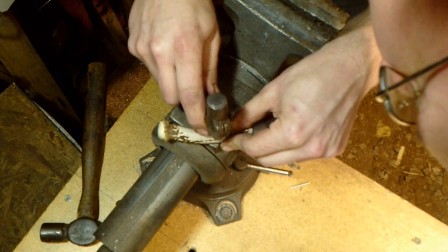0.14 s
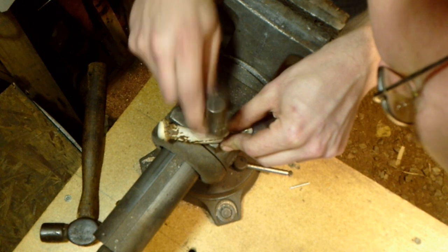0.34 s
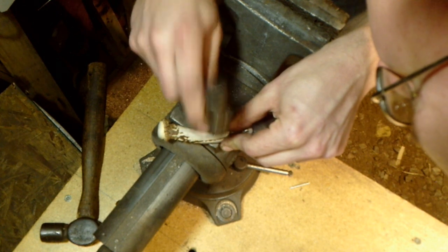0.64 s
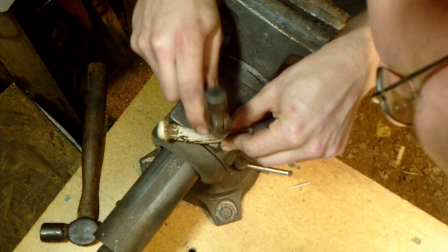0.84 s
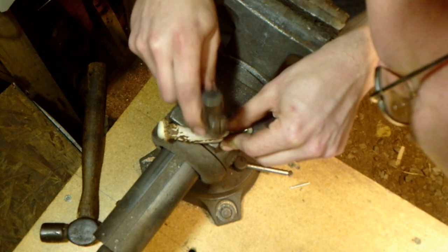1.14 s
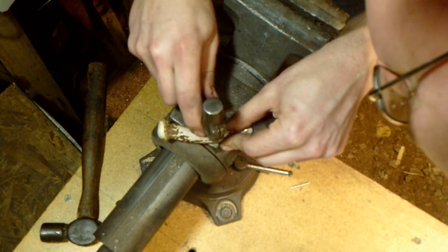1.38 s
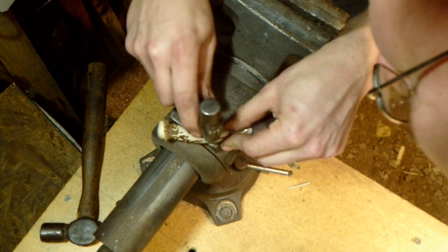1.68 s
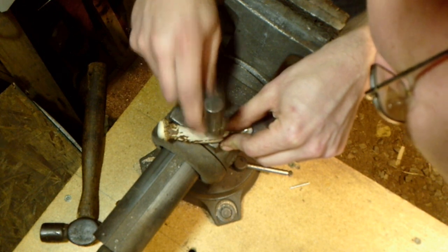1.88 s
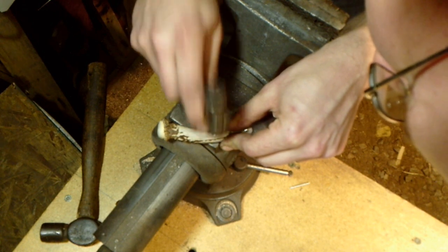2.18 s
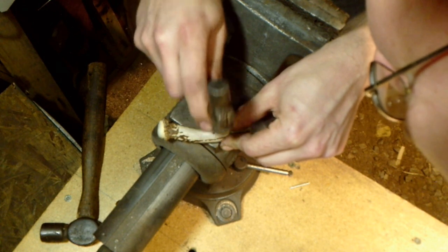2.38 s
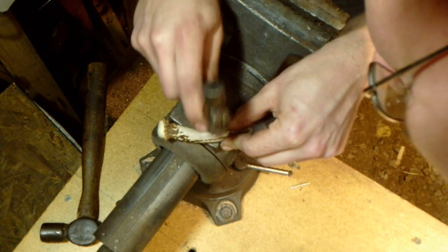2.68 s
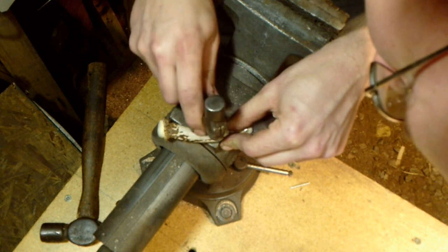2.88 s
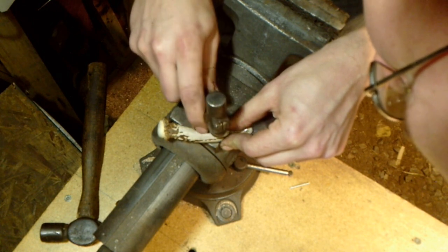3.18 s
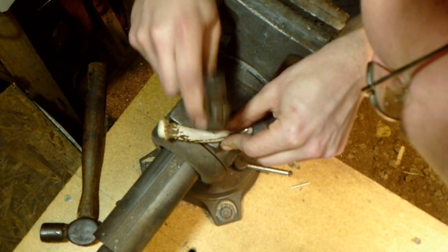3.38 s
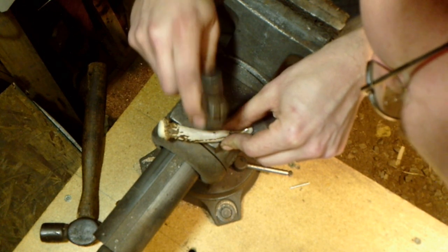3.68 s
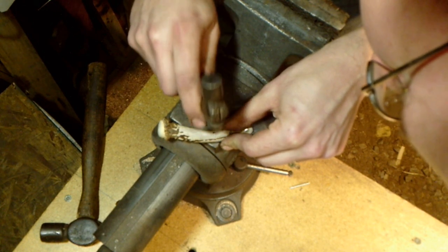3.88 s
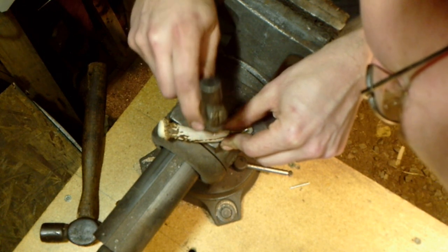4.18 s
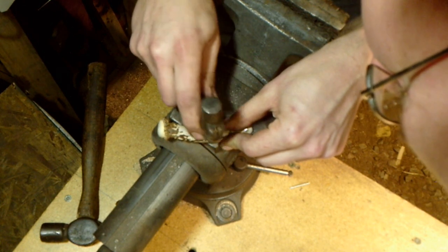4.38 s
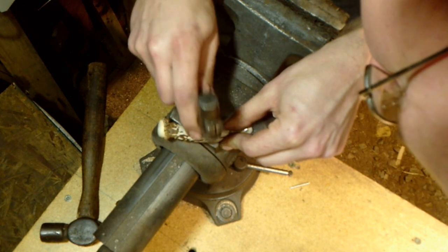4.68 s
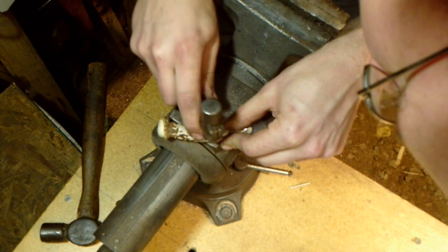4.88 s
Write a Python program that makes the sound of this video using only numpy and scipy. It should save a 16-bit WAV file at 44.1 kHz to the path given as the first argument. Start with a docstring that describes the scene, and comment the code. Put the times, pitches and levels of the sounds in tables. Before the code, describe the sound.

From the first instant a small hammer strikes a steel rivet held on a bench vise, and it continues evenly to the end at 5 seconds: seventeen blows, about 0.3 seconds apart, the pace quickening very slightly. Each is an abrupt, bright metal crack, then a short clanking ring strongest around 2 to 2.5 kHz, with a hollow wooden knock from the bench at about 600 to 900 Hz. Everything dies within about 0.15 seconds, apart from a weak low tail, in a small, dry workshop. Force and hardness vary a little; blows around 1.3 to 2 seconds are among the strongest and brightest, while several after 3.1 seconds are duller. At about 4.5 seconds a tiny rising scrape falls between blows, barely audible. Behind lie soft steady rumble, hiss and a low hum near 100 Hz, slowly sagging and fading. The close mono pickup has little treble and crunches on peaks.

```python
"""A small hammer peens a steel rivet on a bench vise, about three even blows a second, heard close up.
Each blow is a bright noise crack over dying sines for the steel and the wooden bench that it knocks.
Bands of fast-dying noise answer as the small, dry workshop; a faint scrape falls between two blows.
Further back lie steady rumble and hiss, and a low hum that sags and fades.
The close recorder keeps little above 5 kHz and clips the loudest peaks."""
import sys
import numpy as np
from scipy import signal
from scipy.io import wavfile

SR = 44100
rng = np.random.default_rng(int(sys.argv[2]) if len(sys.argv) > 2 else 0)


def transcribe(signal):
    """Save signal, clipped to [-1, 1], as a 16-bit WAV file at the path in sys.argv[1]."""
    frames = np.atleast_2d(signal).T
    limited = np.clip(frames, -1, 1)
    pcm = np.round(limited * 32767).astype(np.int16)
    wavfile.write(sys.argv[1], SR, pcm)


N = 222161

# Steady air of the workshop. Each row: frequency in Hz, relative density in dB per Hz.
AIR_SPECTRUM = [(20, 0), (60, -1.5), (100, -7), (150, -15), (400, -18), (950, -21.5), (1400, -28.5),
                (2800, -31), (4500, -35.5), (6000, -37.5)]
# Dense response of the workshop to a blow. Each row: frequency in Hz, relative density in dB per Hz.
ROOM_SPECTRUM = [(30, -18.5), (150, -9.5), (400, 0.5), (850, 1), (1250, -5.5), (1800, -3), (2300, -2.5),
                 (3000, 0.5), (4000, -3), (5000, -5.5), (6000, -5)]
# Decay of the workshop. Each row: frequency in Hz, time to fall by 60 dB in s.
ROOM_DECAY = [(60, 0.53), (200, 0.27), (700, 0.14), (1500, 0.15), (3000, 0.12), (5500, 0.1)]
# Bench with the vise bolted on, plus a few long-ringing low resonances of the workshop. Each row: frequency in
# Hz, relative level in dB, time to fall by 60 dB in s.
BENCH_MODES = [(52.7, -27, 0.55), (74.5, -25.5, 0.46), (92.6, -21.5, 0.32), (151.3, -21.5, 0.14),
               (180.5, -17.5, 0.16), (227.5, -13.5, 0.15), (262.4, -21.5, 0.12), (303.7, -15.5, 0.16),
               (319.3, -17, 0.173), (365.2, -19.5, 0.24), (422, -11.5, 0.13), (465.8, -15.5, 0.153),
               (479.6, -24, 0.28), (523.3, -13.5, 0.114), (542.4, -16.5, 0.141), (606.7, -9.5, 0.124),
               (622.2, -13, 0.18), (641, -6.5, 0.11), (677.4, -15, 0.15), (705, -24, 0.186),
               (750, -22, 0.26), (796.6, -11.5, 0.15), (855.3, -15, 0.16), (890.9, -9.5, 0.14),
               (912.4, -9.5, 0.14), (936, -22.5, 0.24), (1009, -16.5, 0.164), (1032, -15, 0.1)]
# Vise jaws and hammer head. Each row: frequency in Hz, relative level in dB, time to fall by 60 dB in s.
STEEL_MODES = [(1267.3, -18.5, 0.129), (1495, -23.5, 0.167), (1621, -18.5, 0.17), (1782, -14, 0.105),
               (1836, -16, 0.097), (2022, -19, 0.12), (2128, -13.5, 0.112), (2178.5, -6, 0.125),
               (2200.5, -10, 0.15), (2254, -10.5, 0.14), (2316, -7.5, 0.11), (2366.2, -1.1, 0.1),
               (2390.7, -5, 0.13), (2462, -18.5, 0.047), (2762, -13.5, 0.087), (2784, -10, 0.11),
               (2868, -14, 0.11), (2946, -12.5, 0.11), (3320, -18.5, 0.088), (3336, -15.5, 0.077),
               (3400, -11.5, 0.13), (3574, -16.5, 0.11), (3610, -16, 0.13), (3790, -19, 0.048),
               (4010, -20.5, 0.08), (4330, -21.5, 0.085), (4540, -19.5, 0.15), (4622, -11, 0.13),
               (4595, -18, 0.17), (4880, -23.5, 0.115)]
# Hammer blows. Each row: start in seconds, weight in dB, hardness of contact in dB.
HAMMER_BLOWS = [(0.0205, -1.5, -0.5), (0.3469, -3, 1), (0.6598, -3.5, -1.5), (0.9826, -4.5, -.5),
                (1.2898, -1.3, 1.5), (1.5975, -2, -1), (1.9092, -1.2, 2.5), (2.2205, -3.5, -1),
                (2.526, -2.5, 1), (2.833, -2.5, 1.5), (3.1258, -3.5, -4), (3.4277, -3.5, -2.5),
                (3.729, -3.5, -5.5), (4.021, -1.6, -1.5), (4.2969, -4.5, -0.1), (4.5822, -4.5, -5),
                (4.868, -4, -3)]

# low hum: pitch and peak level at the start, then its steady fall
HUM_HZ, HUM_DB = 103.3, -44.5
HUM_SAG_HZ_PER_S, HUM_FADE_DB_PER_S = 2.3, 2
# faint scrape between two blows, as the workpiece is shifted on the vise; its pitch rises
SCRAPE_START_S, SCRAPE_LENGTH_S, SCRAPE_DB = 4.473, 0.095, -57
SCRAPE_HZ, SCRAPE_RISE_HZ_PER_S, SCRAPE_WIDTH_HZ = 2480, 4000, 300
ECHO_BUILD_S = 0.0078  # time constant of the build-up of the reflections
# the steel rings louder under a heavier and a harder blow: dB, dB per dB of weight, dB per dB of hardness
RING_DB, RING_PER_WEIGHT, RING_PER_HARDNESS = 1.42, 0.41, 0.38
# recorder, in units of full scale
OVERLOAD, CONVERTER_OFFSET = 0.71, 0.0065
CUTOFF_HZ = 16000


def from_db(db):
    """Turns decibels into an amplitude factor."""
    return 10 ** (np.asarray(db) / 20)


def rms_one(x):
    """Scales a signal to rms 1."""
    return x / np.sqrt(np.mean(x ** 2) + 1e-20)


def at_hz(points, hz):
    """Reads a table on a log-frequency axis."""
    points = np.array(points)
    return np.interp(np.log(hz), np.log(points[:, 0]), points[:, 1])


def dying(t, t60):
    """Falls by 60 dB in t60."""
    return np.exp(-np.log(1000) * t / t60)


def filtered(x, hz, kind):
    """Second-order Butterworth filter."""
    return signal.sosfilt(signal.butter(2, hz, kind, fs=SR, output="sos"), x)


def noise_bands(spectrum, size):
    """Third-octave bands of noise that follow a spectrum, together near rms 1: centres, bands."""
    edges = 18 * 2 ** (np.arange(27) / 3)
    centres = np.sqrt(edges[:-1] * edges[1:])
    gains = from_db(at_hz(spectrum, centres)) * np.sqrt(np.diff(edges))
    gains /= np.linalg.norm(gains)
    # neighbouring bands use different noise; the first half second lets the filters settle
    white = rng.standard_normal((2, size + SR // 2))
    bands = []
    for k, pair in enumerate(zip(edges, edges[1:])):
        bands.append(rms_one(filtered(white[k % 2], pair, "band")[-size:]))
    return centres, np.array(bands) * gains[:, None]


def hum():
    """A single low sine whose pitch sags while its level fades."""
    t = np.arange(N) / SR
    hz = HUM_HZ - HUM_SAG_HZ_PER_S * t
    level = from_db(HUM_DB - HUM_FADE_DB_PER_S * t)
    return level * np.sin(2 * np.pi * np.cumsum(hz) / SR)


def workshop_air(air_db):
    """Steady rumble and hiss: noise weighted towards the lows."""
    _, bands = noise_bands(AIR_SPECTRUM, N)
    return from_db(air_db) * bands.sum(axis=0)


def scrape(rub_db):
    """Friction noise in a rising resonance, over a broader rub mostly below it."""
    t = np.arange(N) / SR - SCRAPE_START_S
    sliding = np.clip(np.minimum(t, SCRAPE_LENGTH_S - t) / 0.005, 0, 1)  # 5 ms fades
    hz = SCRAPE_HZ + SCRAPE_RISE_HZ_PER_S * np.clip(t, 0, SCRAPE_LENGTH_S)
    # slow noise on a sine carrier makes a narrow band around the moving pitch
    slow_noise = filtered(rng.standard_normal(N), SCRAPE_WIDTH_HZ / 2, "low")
    resonance = rms_one(slow_noise * np.sin(2 * np.pi * np.cumsum(hz) / SR))
    rub = rms_one(filtered(rng.standard_normal(N), [800, SCRAPE_HZ], "band"))
    return from_db(SCRAPE_DB) * sliding * (resonance + from_db(rub_db) * rub)


def reflections(t):
    """Dense echoes build up in milliseconds and die band by band: centres, long noise grain, envelopes."""
    hz, grain = noise_bands(ROOM_SPECTRUM, N + 2 * len(t))
    decay = dying(t, at_hz(ROOM_DECAY, hz)[:, None])
    build_up = 1 - np.exp(-t / ECHO_BUILD_S)
    return hz, grain, decay * build_up


def ringing(modes, t, neighbour_factor):
    """One dying sine a mode, each scaled by one more power of neighbour_factor: pitches, rings."""
    hz, level_db, t60 = np.transpose(modes)[:, :, None]
    factors = neighbour_factor ** np.arange(len(modes))[:, None]
    rings = factors * from_db(level_db) * np.sin(2 * np.pi * hz * t) * dying(t, t60)
    return hz[:, 0], rings


def bench_ringing(t):
    """The bench, reached through the vise, with a few low resonances of the workshop: opposed neighbouring
    modes make them swell a little later."""
    return ringing(BENCH_MODES, t, -1)


def steel_ringing(t):
    """The steel is struck directly: its modes start in step, slightly weaker from each to the next."""
    return ringing(STEEL_MODES, t, 0.99)


def crack(t, t60, low_hz):
    """Steel meets steel: a bright noise burst that is gone in a few hundredths of a second."""
    return filtered(rng.standard_normal(len(t)), low_hz, "high") * dying(t, t60)


def strike(blow, hz, parts, scatter_db):
    """Weight drives the lows, hardness the highs, both the ring between; parts vary with the spot hit."""
    _, weight_db, hard_db = blow
    ring_db = RING_DB + RING_PER_WEIGHT * weight_db + RING_PER_HARDNESS * hard_db
    drive = [(900, weight_db), (2100, ring_db), (2500, ring_db), (3200, hard_db)]
    spot_db = scatter_db * rng.standard_normal(len(hz))
    return from_db(at_hz(drive, hz) + spot_db) @ parts


def hammering(bench_db, steel_db, room_db, changing_db, crack_db):
    """Every blow excites the same bench, steel and room, with a contact crack of its own."""
    t = np.arange(SR // 2) / SR
    steel, bench = steel_ringing(t), bench_ringing(t)
    hz, grain, envelopes = reflections(t)
    room = envelopes * grain[:, -len(t):]  # the same grain at every blow
    # the hands and the workpiece shift between blows, which changes the short waves most
    changing = envelopes * (hz / (hz + 700))[:, None]
    out = np.zeros(N + len(t))
    for blow in HAMMER_BLOWS:
        start_s, _, hard_db = blow
        start = round(start_s * SR)
        span = slice(start, start + len(t))
        out[span] += from_db(bench_db) * strike(blow, *bench, scatter_db=1.0)
        out[span] += from_db(steel_db) * strike(blow, *steel, scatter_db=1.74)
        out[span] += from_db(room_db) * strike(blow, hz, room, scatter_db=0.77)
        out[span] += from_db(changing_db) * strike(blow, hz, changing * grain[:, span], scatter_db=1.5)
        out[span] += from_db(crack_db + hard_db) * crack(t, t60=0.05, low_hz=1750)
    return out[:N]


def scene():
    """Background, scrape and hammering as one channel."""
    background = hum() + workshop_air(air_db=-45.5)
    shifting = scrape(rub_db=-0.5)
    blows = hammering(bench_db=1.5, steel_db=0.5, room_db=-1.5, changing_db=-1.5, crack_db=7)
    return (background + shifting + blows)[None]


def record(dry):
    """The close recorder samples at a quarter of the rate and clips hard, then clips again at full rate."""
    coarse = signal.resample_poly(dry, 1, 4, axis=1) + CONVERTER_OFFSET
    coarse = np.clip(coarse, -OVERLOAD, OVERLOAD)
    # peaks swell between the coarse samples; clipping them splatters above 6 kHz, where little else lies
    full_rate = signal.resample_poly(coarse, 4, 1, axis=1)[:, :N]
    clipped = np.clip(full_rate, -OVERLOAD, OVERLOAD)
    lowpass = signal.firwin(241, CUTOFF_HZ, fs=SR, window="blackman")
    return signal.fftconvolve(clipped, lowpass[None], "same")


dry = scene()
out = record(dry)
transcribe(out)
```